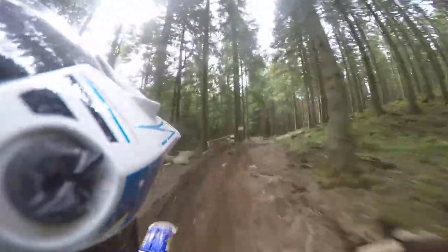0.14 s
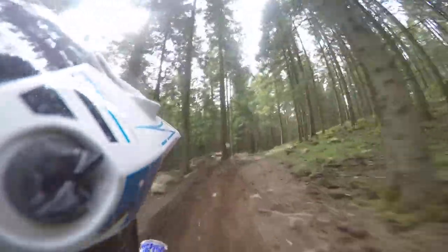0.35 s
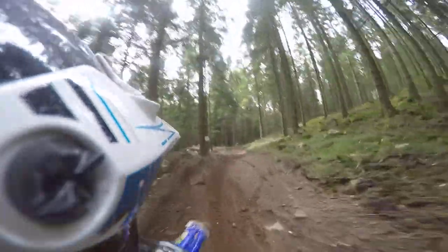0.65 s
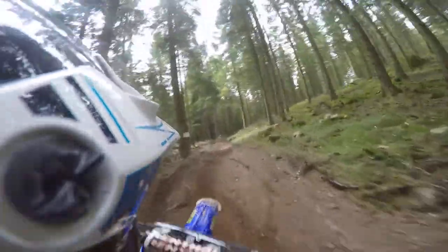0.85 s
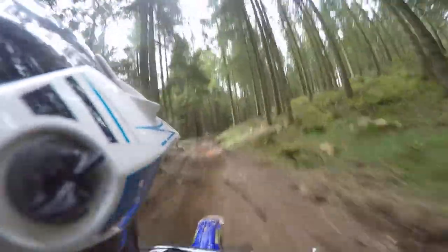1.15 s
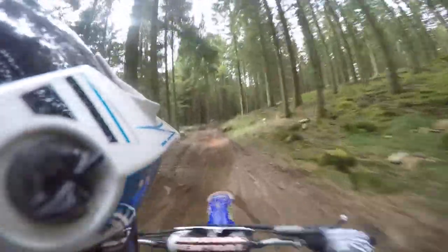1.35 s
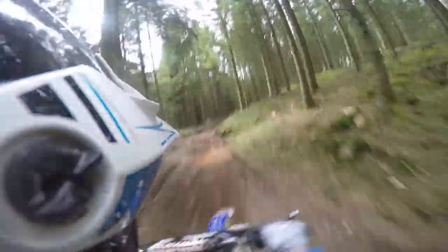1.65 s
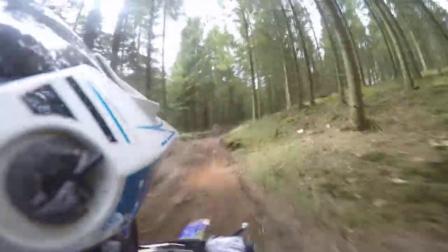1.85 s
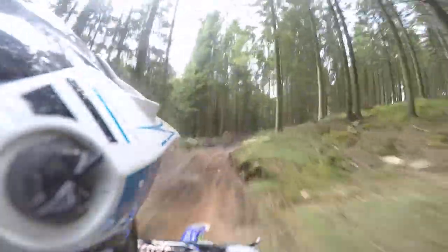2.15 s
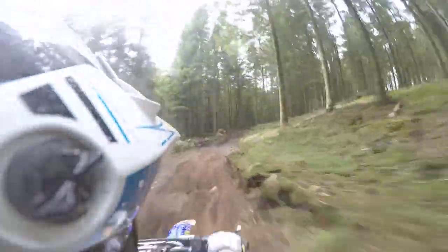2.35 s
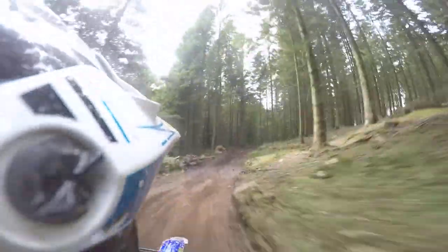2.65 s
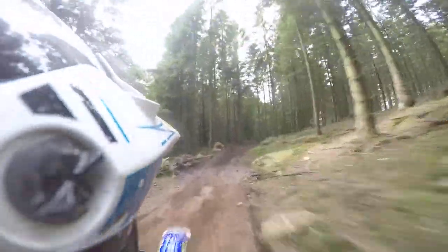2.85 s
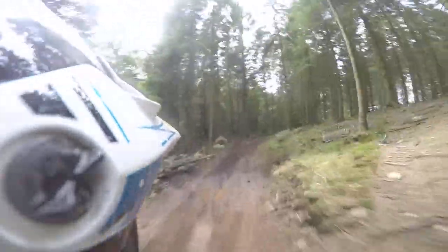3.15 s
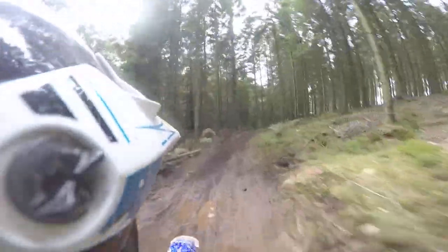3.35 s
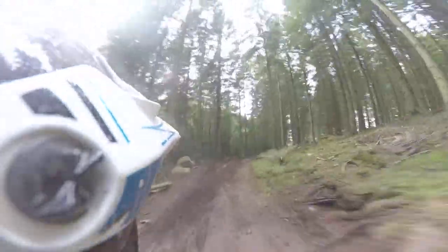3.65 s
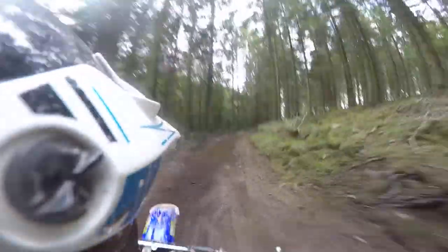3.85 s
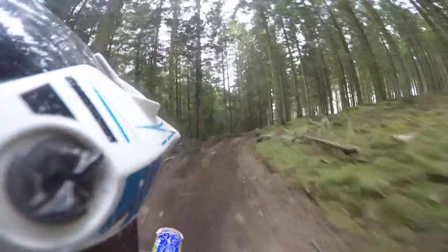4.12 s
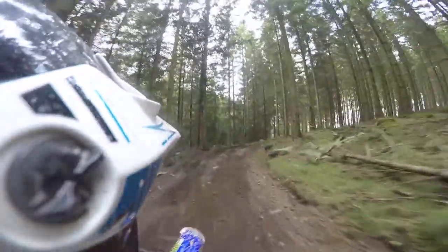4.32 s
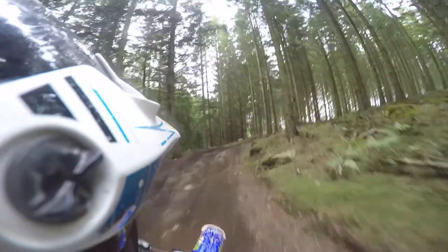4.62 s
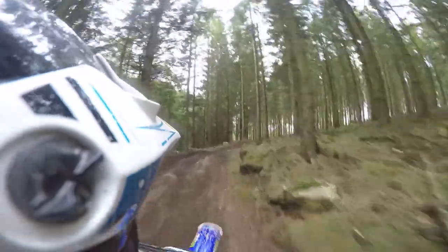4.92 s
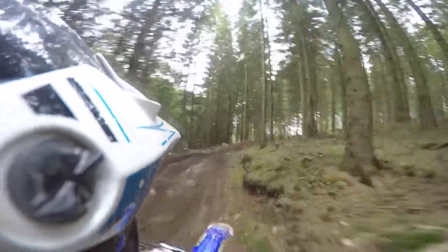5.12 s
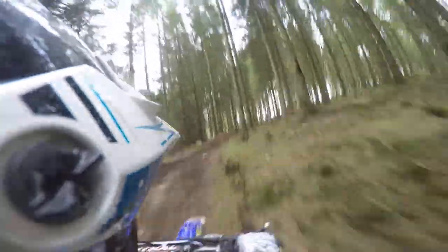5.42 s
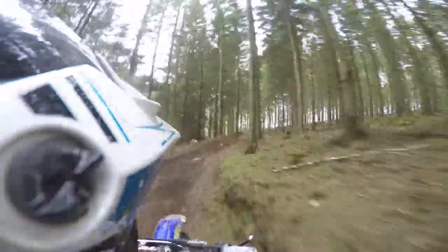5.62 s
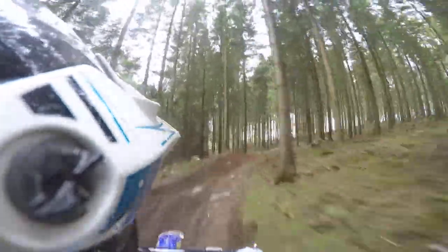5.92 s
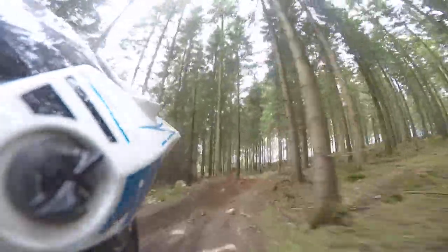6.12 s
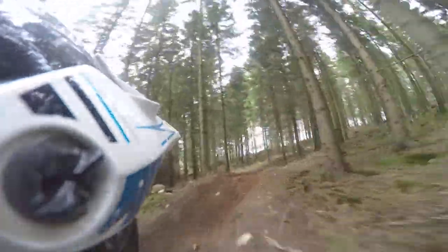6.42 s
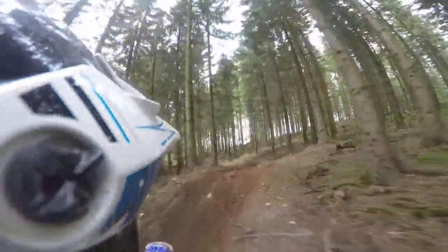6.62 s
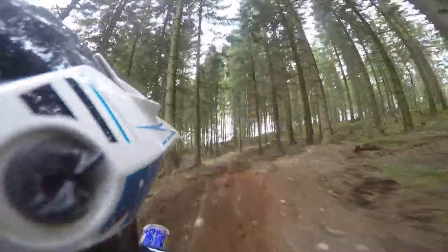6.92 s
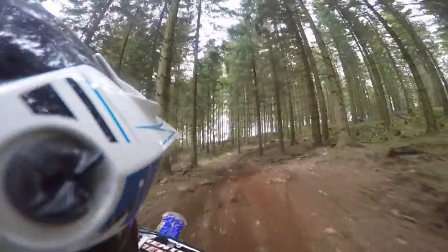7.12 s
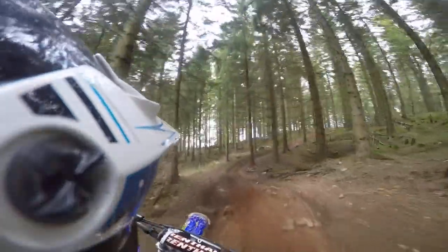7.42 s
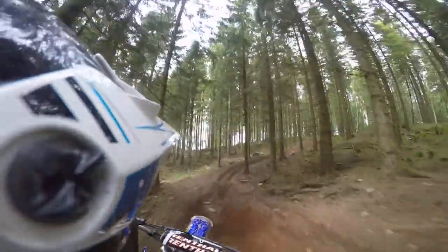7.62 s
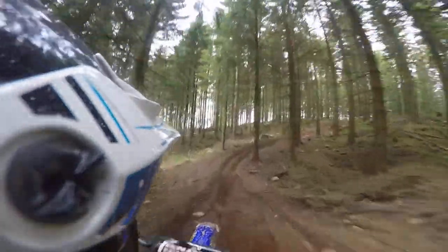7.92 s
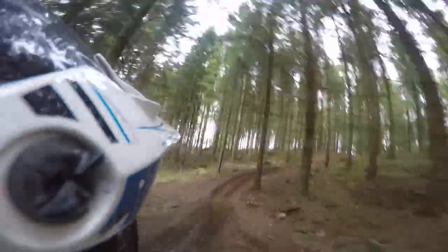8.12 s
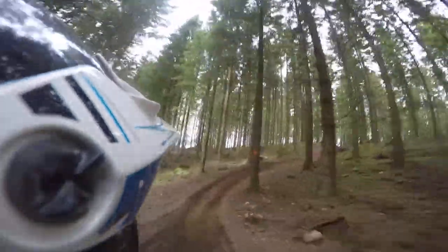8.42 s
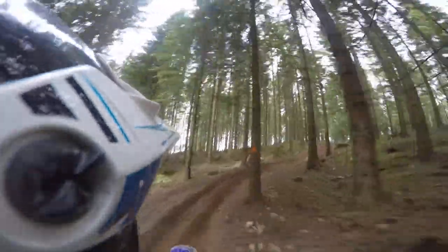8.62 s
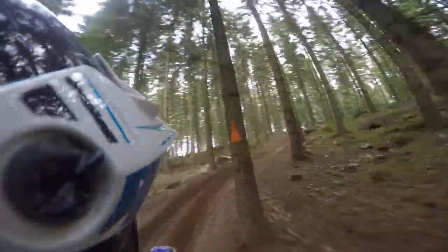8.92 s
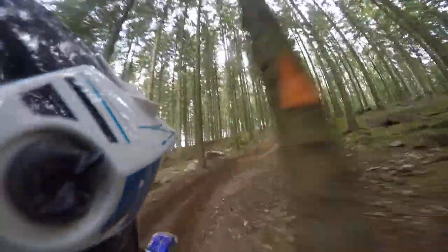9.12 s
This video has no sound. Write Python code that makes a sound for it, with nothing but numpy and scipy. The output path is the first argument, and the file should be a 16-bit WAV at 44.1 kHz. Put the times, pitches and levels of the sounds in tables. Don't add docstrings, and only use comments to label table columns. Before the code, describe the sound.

A two-stroke dirt bike rasps in ragged bursts along a forest track, revs flaring and dropping between popping misfires, over chain clatter and wind buffeting.

```python
import sys
import numpy as np
from scipy import signal
from scipy.fft import rfft, irfft
from scipy.io import wavfile
from scipy.ndimage import uniform_filter1d

SR = 44100
rng = np.random.default_rng(int(sys.argv[2]) if len(sys.argv) > 2 else 0)


def boost(x):
    u = np.asarray(x, float) / 20
    return 10 ** u


def persist_wave(psi):
    counts = np.round(np.clip(psi, -1, 1) * 32767).astype(np.int16)
    wavfile.write(sys.argv[1], SR, np.atleast_2d(counts).T)


N = 408366


# (time [s], level [dB])
HELMET_SHADE = [
    (0, 2.5),
    (6.9, 2.5),
    (7.3, 4),
    (7.48, 0),
    (7.58, -13),
    (8.1, -12),
    (8.5, 1.5),
]


def engine():
    speed = crank_speed()
    at, fired = turns(speed)
    crack, boom = firings(speed, at[fired])
    air = pumping(speed, at, fired)
    top_boom = boom[2] * boost(0.06 * (speed - 81.0) + in_time(HELMET_SHADE)[0])
    return cracks(crack, speed) - pipe([*boom, top_boom], column=2) - pipe([air] * 4, column=3)


def firings(speed, on):
    height = np.sqrt(SR / speed)
    crack_db, boom_db = load(speed)
    crack_db = crack_db - 3.5 + 1.3 * rng.standard_normal(N)
    boom_db = boom_db + 0.4 * rng.standard_normal(N)
    crack, boom = np.zeros(N), np.zeros((3, N))
    crack[on] = (height * boost(crack_db))[on]
    boom[:, on] = (height * boost(boom_db))[:, on]
    for s, peak_db, low_db in strays(speed):
        i = round(s * SR)
        crack[i] = boost(peak_db + 4)
        boom[:, i] = boost(low_db + np.array([21, 23, 19]))
    return crack, boom


# (time [s], clatter from rough ground [dB], air pumped past the nearly shut throttle [dB])
COASTING = [(0, -25, -31), (.7, -29, -23.5), (1.44, -20, -26.5), (2.04, -31, -36.5), (2.79, -27.5, -33.5),
            (3.3, -25, -38.5), (3.5, -41.5, -43), (3.71, -28.5, -33), (4.05, -36.5, -40),
            (4.41, -27, -23.5), (5.49, -23, -26.5), (5.95, -32.5, -33.5), (6.4, -24, -25.5),
            (6.7, -30.5, -32.5), (7.1, -31.5, -32.5), (8.0, -23, -23.5), (8.3, -33.5, -39.5),
            (9.26, -28.5, -31.5)]


def pumping(speed, at, fired):
    pump_db = in_time(COASTING)[1] + 14 * built_up(0.15)
    puff_db = pump_db - 2 + 2.5 * rng.standard_normal(N) + 3 * drift(5)
    off = at[~fired]
    puff = np.zeros(N)
    puff[off] = (np.sqrt(SR / speed) * boost(puff_db))[off]
    pulling = np.interp(np.arange(N), at, fired)
    flow_db = pump_db - 4 - 15 * pulling + 2.5 * drift(25)
    return puff + boost(flow_db) * rng.standard_normal(N)


# (time [s], speed [turns/s])
GEARED_SPEED = [(0.0, 60), (0.1, 85), (0.47, 66.5), (1.08, 41.7), (1.6, 88.0), (2.2, 40.1), (2.6, 63.8),
                (3.04, 64.7), (3.44, 79), (3.55, 42.6), (4.2, 51.5), (5.3, 77.9), (6.1, 57.0), (6.5, 68.5),
                (7.2, 56), (7.75, 62.6), (8.3, 84.2), (9.26, 46)]
# (peak time [s], extra speed [turns/s], spread [s])
WHEELSPIN = [(0.606, 64, 0.064), (0.788, 22.3, 0.15), (1.022, 21, 0.051), (1.146, 16.8, 0.031),
             (1.262, 35.3, 0.112), (1.278, 15.8, 0.026), (1.446, 27.2, 0.042), (1.565, 30.2, 0.023),
             (1.841, 26.8, 0.027), (1.953, 49.3, 0.055), (2.125, 45, 0.071), (2.345, 39.5, 0.093),
             (3.138, 23.5, 0.032), (3.262, 46.4, 0.094), (3.628, 10.6, 0.036), (3.792, 26.6, 0.11),
             (4.441, 6.6, 0.05), (4.705, 12.4, 0.05), (5.035, 13.1, 0.029), (5.213, 7.5, 0.099),
             (5.726, 4.8, 0.018), (6.301, 11.2, 0.059), (6.613, 20.7, 0.1), (7.421, 3.93, 0.055),
             (7.599, 6.25, 0.043), (7.911, 20.3, 0.074), (8.133, 28.8, 0.048), (8.55, 10.4, 0.029),
             (9.067, 15.7, 0.064), (9.285, 13, 0.074)]
# (time [s], speed lost [turns/s], negative for a rise,
# spread [s])
REV_DIPS = [
    (3.2, 6, 0.018),
    (4.83, 9, .022),
    (5.1, 6.5, 0.019),
    (5.46, 6, 0.028),
    (5.86, -5, .03),
    (6.8, 11.5, .028),
    (8.02, 3.5, 0.021),
    (8.46, 7, 0.031),
]


def crank_speed():
    return in_time(GEARED_SPEED)[0] + bumps(WHEELSPIN) - bumps(REV_DIPS)


# (first firing [s], last firing [s])
OPEN_THROTTLE = [(0.0105, 0.073), (0.4819, 1.617), (1.768, 2.024), (2.2564, 2.414), (3.0465, 3.262),
                 (3.5503, 3.644), (3.7223, 3.839), (4.4462, 5.305), (5.472, 5.529), (5.6648, 5.848),
                 (6.8034, 6.911), (7.1697, 8.139), (8.4739, 8.541), (8.9247, 9.093), (9.2112, 9.249)]


def turns(speed):
    angle = np.cumsum(speed) / SR
    onsets = [first for first, last in OPEN_THROTTLE] + [row[0] for row in strays(speed)]
    for s in sorted(onsets):
        i = round(s * SR)
        angle[i:] += np.round(angle[i]) - angle[i]
    fired = np.zeros(N, bool)
    for first, last in OPEN_THROTTLE:
        fired[round(first * SR) - 1:round(last * SR)] = True
    whole_turns = np.maximum.accumulate(np.floor(angle))
    at = np.flatnonzero(np.diff(whole_turns) > 0) + 1
    starts = [round(first * SR) for first, last in OPEN_THROTTLE]
    early = np.min(np.abs(at[:, None] - starts), axis=1) < SR // 200
    at = np.union1d(at[~early], starts)
    return at, fired[at]


# (time [s], crack peak [dB], boom [dB])
LONE_FIRINGS = [(0.2648, 4.5, -18), (0.3046, 3.5, -25), (.466, -26, -18.5), (1.7046, -10, -30),
                (1.753, -17, -18), (2.925, -12.5, -25), (2.953, -5, -28), (2.9846, -10.5, -16.5),
                (3.5255, -22.5, -25.5), (4.3613, -3, -17), (5.3666, -28, -26), (5.5543, -5, -22),
                (5.6333, -0.5, -19), (6.1373, 0.5, -14), (6.174, 3, -13), (6.2082, -8, -19),
                (6.6039, -4, -26), (6.6153, 7, -21), (6.6272, -9, -35), (6.758, -37, -19),
                (6.778, -33, -18), (7.11, -37, -38), (7.13, -35, -23), (7.1499, -17, -15),
                (8.458, -26, -19), (8.5956, -0.5, -19.5), (8.6934, -2, -18)]
# (time [s], crack peak [dB], boom [dB])
DOUBLE_FIRINGS = [(3.6746, -4.5, -20), (4.3969, 0, -9), (5.4164, -1.5, -15.5), (6.224, 2, -14.5),
                  (6.2672, 2.5, -17.5), (6.4798, 5.5, -14), (6.5322, 4.5, -19), (8.1778, -4.5, -22),
                  (8.759, -1, -16), (8.8057, -1.5, -15.5), (8.8734, -0.5, -15.5)]


def strays(speed):
    seconds = [(s + 1 / speed[round(s * SR)], crack_db - 2, boom_db - 3.5)
               for s, crack_db, boom_db in DOUBLE_FIRINGS]
    return [*LONE_FIRINGS, *DOUBLE_FIRINGS, *seconds]


# (time [s], level [dB])
THROTTLE_HAND = [(0, -1), (.48, 5.5), (.6, -15.5), (.68, -5), (.78, -6), (1.0, -0.5), (1.25, -3), (1.9, -1),
                 (3.07, -2.5), (3.26, -10), (3.55, -7.5), (3.62, 1.5), (4.45, 0), (4.8, 0), (7.17, 2),
                 (7.28, -0.5), (7.45, 0.5), (8.14, -4)]
# (start time [s], crack [dB], boom in the low, middle and upper resonances [dB] x 3)
PULL_STAGES = [(0, -20.5, -15, -25, -19), (.48, -22, -19, -24, -21.5), (.64, -24.5, -21.5, -23, -29.5),
               (.95, -25, -18, -32, -27), (1.4, -27.5, -25, -33, -30), (1.77, -21.5, -19, -23, -26.5),
               (1.9, -26, -26, -34, -30), (2.26, -21.5, -22.5, -23.5, -27), (3.05, -18.5, -26, -12.5, -22),
               (3.16, -20.5, -22, -22.5, -26.5), (3.55, -22.5, -19, -30, -23),
               (3.72, -20.5, -21.5, -25.5, -26), (4.45, -20, -14, -17, -23), (4.95, -22, -18, -24, -22),
               (5.1, -23.5, -21, -22, -23), (5.47, -15.5, -18.5, -16, -21), (5.66, -20, -20, -20, -24),
               (6.8, -17.5, -18.5, -16.5, -22), (7.17, -21, -20.5, -14.5, -23),
               (7.33, -20, -15.5, -27, -18), (7.9, -21, -22, -28, -20), (8.47, -15, -17.5, -19.5, -22.5),
               (8.92, -15, -21, -14.5, -21.5), (9.21, -14, -35, -14.5, -16.5)]


def load(speed):
    lead_s = 0.035
    s, hand = np.arange(N) / SR, in_time(THROTTLE_HAND)[0]
    first, last = np.transpose(OPEN_THROTTLE)
    pull = np.maximum(np.searchsorted(first, s + 1 / 200) - 1, 0)
    start, *levels = np.transpose(PULL_STAGES)
    stage = np.maximum(np.searchsorted(start - lead_s, s) - 1, 0)
    staged = np.array(levels)[:, stage]
    crack_db, *boom_db = uniform_filter1d(staged, round(lead_s * SR), axis=1)
    opening = 1.5 * np.exp(-np.abs(s - first[pull]) / 0.08)
    shutting = np.exp(-np.abs(last[pull] - s) / 0.021)
    closing = np.outer([-12.5, -5, -8], shutting)
    wander = 1.5 * np.array([drift(6) for row in range(3)])
    boom = np.array(boom_db) + 0.72 * hand + 0.2 * (speed - 80) + opening + closing + wander
    crack = crack_db + hand - 3 * shutting + 0.3281 * (speed - 80)
    return crack, boom


def built_up(time_s):
    s, out = np.arange(N) / SR, np.zeros(N)
    for first, last in OPEN_THROTTLE:
        is_open = (s >= first) & (s < last)
        out += is_open * (1 - np.exp(-np.maximum(s - first, 0) / time_s))
    return out


# (delay [s], level [dB])
GROUND_ECHOES = [
    (.0040, -6),
    (.0082, -13),
    (.0125, -18),
]
# (frequency [Hz], width [Hz], level [dB])
SILENCER_RING = (1800, 200, -5)
# (frequency [Hz], level [dB per Hz])
CAMERA_HOUSING = [(500, -3), (850, -7), (1030, 1), (1370, -7), (1830, -6), (2400, -1.5), (2950, 2),
                  (3550, -9.5), (4100, -6), (4850, -5), (6000, -12.5), (8700, -26), (14000, -34),
                  (15800, -36)]
# (frequency [Hz], level [dB])
SHOCK_TILT = [(300, -0.5), (700, -6), (2000, 8), (5000, 11.5), (12000, 13)]
# (frequency [Hz], level [dB])
DULL_TILT = [(300, -39.5), (700, 3.5), (1800, 4.5), (3000, 2), (6000, 4), (12000, 11)]


def cracks(strength, speed):
    at = np.flatnonzero(strength)
    echoes = np.zeros(N)
    for delay_s, echo_db in GROUND_ECHOES:
        delay = (delay_s + 0.0003 * drift(8)[at]) * SR
        late = np.minimum(at + np.round(delay).astype(int), N - 1)
        echoes[late] += strength[at] * boost(echo_db + 2.5 * drift(20)[at])
    echoes = signal.sosfilt(signal.butter(2, 6000, fs=SR, output="sos"), echoes)

    fall = boost(-60 / (0.062 * SR))
    gate = signal.lfilter([0] * 40 + [np.sqrt(1 - fall ** 2)], [1, -fall], strength + 1e-18)
    turbulence = gate * rng.standard_normal(N) * boost(-13 + 0.15 * (speed - 70))
    wake = echoes + boost(-2.0) * scatter(strength, t60=0.081) + turbulence

    steep = np.diff(strength * boost(-10 + 0.2 * (np.minimum(speed, 115) - 75)), prepend=0)
    second_db = np.minimum(-4 + 0.5 * (speed - 112), -3)
    second = np.roll(strength * boost(second_db), round(0.0042 * SR))
    jet = np.diff(turbulence * np.clip((speed - 85) / 40, 0, 1), prepend=0)
    front = strength + steep + second + jet

    hz, width_hz, ring_db = SILENCER_RING
    labour = ring(strength * boost(ring_db - 0.7 * np.maximum(speed - 61, 0)), hz, width_hz)
    return colour(front, CAMERA_HOUSING, SHOCK_TILT) + colour(wake, CAMERA_HOUSING, DULL_TILT) + labour


def scatter(strength, t60):
    s = np.arange(round(0.05 * SR)) / SR
    shape = boost(-60 * s / t60) * np.clip(s / 0.00083, 0, 1)
    patterns = rng.standard_normal((4, len(s))) * shape / np.sqrt(4 * np.sum(shape ** 2))
    return sum(signal.oaconvolve(strength * drift(3), pattern)[:N] for pattern in patterns)


# (frequency [Hz], width [Hz], level fired [dB], level pumping [dB])
PIPE_MODES = [
    (101, 213, -0.5, -3.5),
    (273.4, 36.4, 5, -5),
    (328.7, 27.3, 1.5, -2.5),
    (428.6, 61.5, 1.5, -1),
    (510.4, 45, -3, -5.5),
    (678, 300, -11.5, -13),
    (1060, 20, -31, -23.5),
]
STRUCK_BY = [0, 0, 1, 2, 3, 3, 2]


def pipe(pulses, column):
    out = np.zeros(N)
    for k, (mode, row) in enumerate(zip(PIPE_MODES, STRUCK_BY)):
        out += (-1) ** k * boost(mode[column]) * ring(pulses[row], mode[0], mode[1])
    return out


def ring(pulses, hz, width_hz):
    r, w = np.exp(-np.pi * width_hz / SR), 2 * np.pi * hz / SR
    rung = signal.lfilter([1, 0, -1], [1, -2 * r * np.cos(w), r * r], pulses + 1e-18)
    return np.sqrt((1 - r * r) / 2) * rung


# (frequency [Hz], level [dB])
CHAIN_TILT = [(300, -21), (600, 11), (1200, 4), (3000, -2.5), (6000, -2), (12000, -1)]


def clatter():
    sizes = boost(1.25 * np.minimum(rng.exponential(1, N), 5)) * rng.choice([-1, 1], N)
    grains_per_s = 2500 * boost(5.0 * drift(40))
    grains = sizes * (rng.random(N) < grains_per_s / SR)
    mix = rms_one(rms_one(grains) + 0.52 * rng.standard_normal(N))
    level_db = in_time(COASTING)[0] + 3 * built_up(0.033) - 8.0
    return colour(boost(level_db) * mix, CAMERA_HOUSING, CHAIN_TILT)


# (time [s], level [dB])
WIND_LEVEL = [(0.0, -25.5), (0.2, -17.5), (0.74, -35), (0.9, -21), (1.0, -29), (2.16, -26.5), (2.19, -17),
              (2.27, -25), (3.09, -16.5), (3.2, -18.5), (3.48, -31.5), (4.13, -25.5), (6.42, -14.5),
              (6.6, -26), (6.76, -19), (7.97, -12), (8.36, -22.5), (9.26, -12.5)]
# (time [s], level [dB], spread [s])
WIND_GUSTS = [(.54, 6, 0.063), (1.31, 5, 0.097), (1.83, 5.5, .08), (2.89, 3.5, 0.044), (3.32, -3, 0.088),
              (4.07, 6.5, 0.073), (4.41, 5.5, 0.034), (5.7, 4.5, 0.13), (6.37, -11, 0.042),
              (7.09, 1.5, .05), (7.7, -1, 0.2), (8.23, 3, 0.055), (8.46, 9, 0.032)]
# (frequency [Hz], level [dB per Hz])
PORT_BUFFET = [(8.8, -29), (15, -2), (38, -2), (58, -0.5), (99, -7.5), (156, -16.5), (200, -18), (260, -19),
               (440, -120)]


def wind():
    lumps = colour(rng.standard_normal(N) * boost(1.5 * drift(9)), PORT_BUFFET)
    return boost(in_time(WIND_LEVEL)[0] - 0.5 + bumps(WIND_GUSTS)) * rms_one(lumps)


def bumps(rows):
    s = np.arange(N) / SR
    return sum(size * np.exp(-0.5 * ((s - at) / spread) ** 2) for at, size, spread in rows)


def in_time(rows):
    s, *columns = np.transpose(rows)
    return [np.interp(np.arange(N) / SR, s, c) for c in columns]


def rms_one(x):
    return x / np.sqrt(np.mean(x ** 2) + 1e-20)


def drift(rate_hz):
    r = np.exp(-2 * np.pi * rate_hz / SR)
    slow = signal.lfilter([1], [1, -2 * r, r * r], rng.standard_normal(N + SR))
    return rms_one(slow[SR:])


def colour(x, *spectra):
    size = 8192
    log_hz = np.log(np.maximum(np.arange(size // 2 + 1) * SR / size, 1))
    db = 0
    for spectrum in spectra:
        hz, level_db = np.transpose(spectrum)
        db = db + np.interp(log_hz, np.log(hz), level_db)
    cepstrum = irfft(np.log(boost(db)))
    cepstrum[1:size // 2] *= 2
    cepstrum[size // 2 + 1:] = 0
    response = irfft(np.exp(rfft(cepstrum)))
    return signal.fftconvolve(x, response / np.sqrt(np.sum(response ** 2)))[:N]


def scene():
    return (engine() + clatter() + wind())[None]


def top_cut(x):
    return signal.sosfilt(signal.butter(12, 16510, fs=SR, output="sos"), x)


def record(dry):
    top = 0.97
    rounded = dry / (1 + np.abs(dry / top) ** 4) ** 0.25
    low_pass = signal.cheby2(10, 50, 16400, fs=SR, output="sos")
    return top_cut(signal.sosfilt(low_pass, rounded))


dry = scene()
out = record(dry)
persist_wave(out)
```